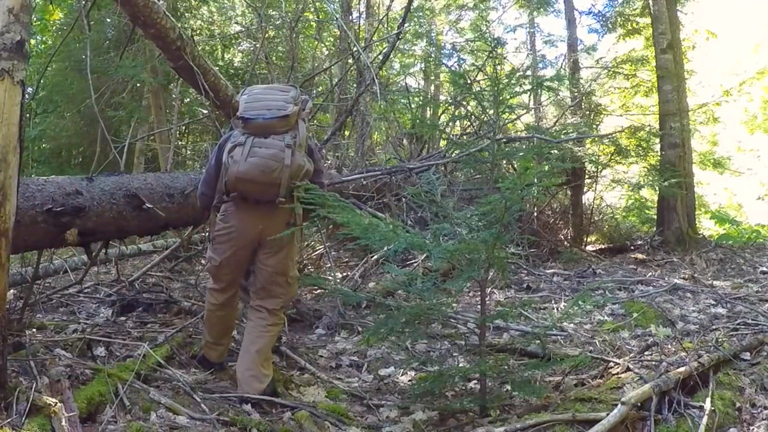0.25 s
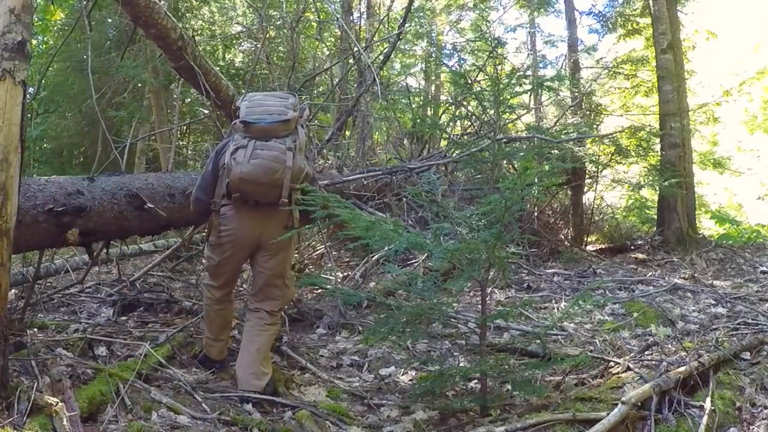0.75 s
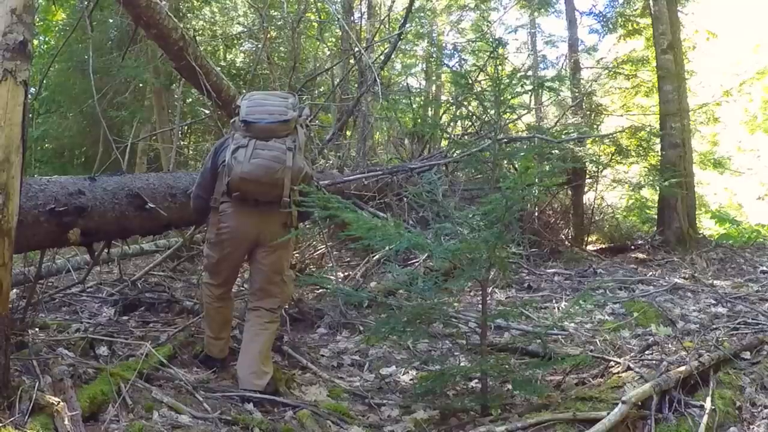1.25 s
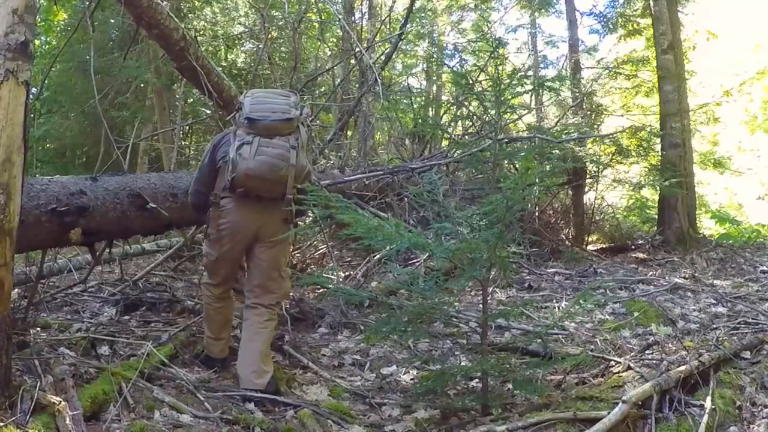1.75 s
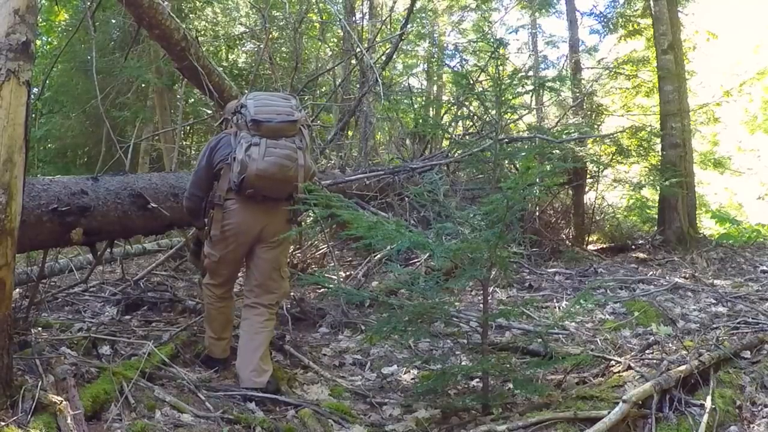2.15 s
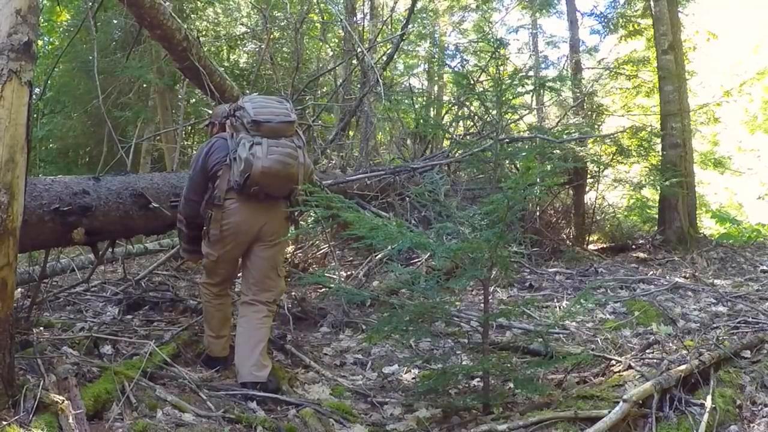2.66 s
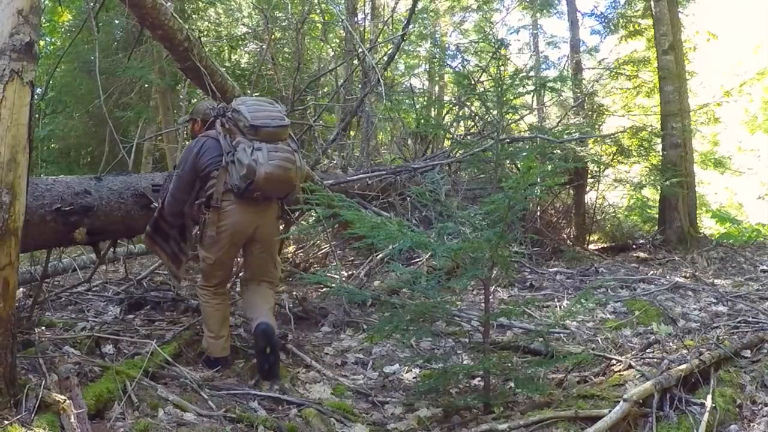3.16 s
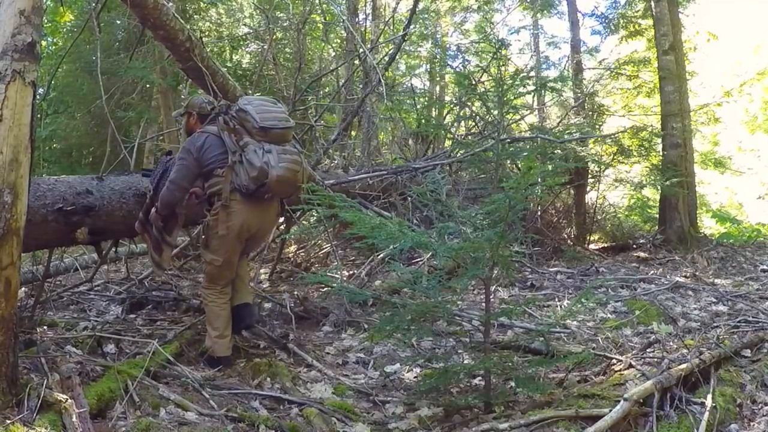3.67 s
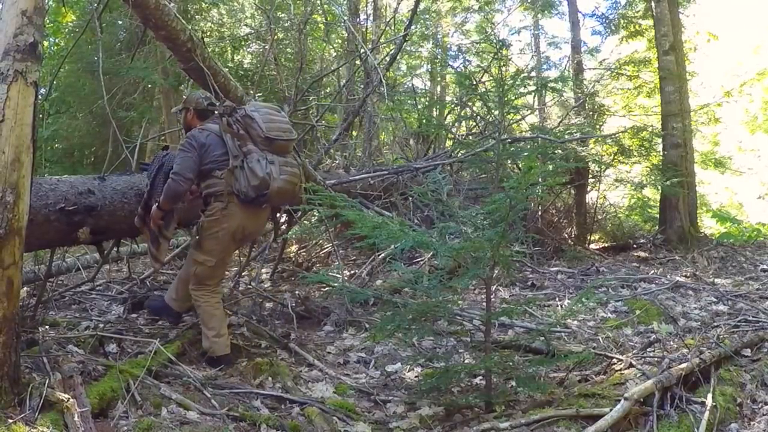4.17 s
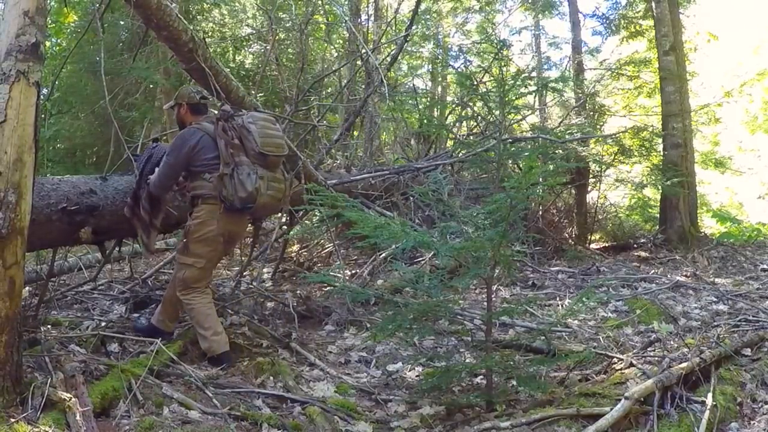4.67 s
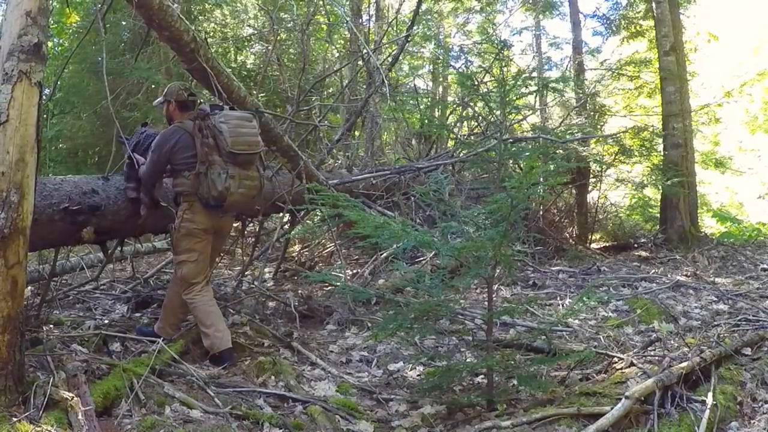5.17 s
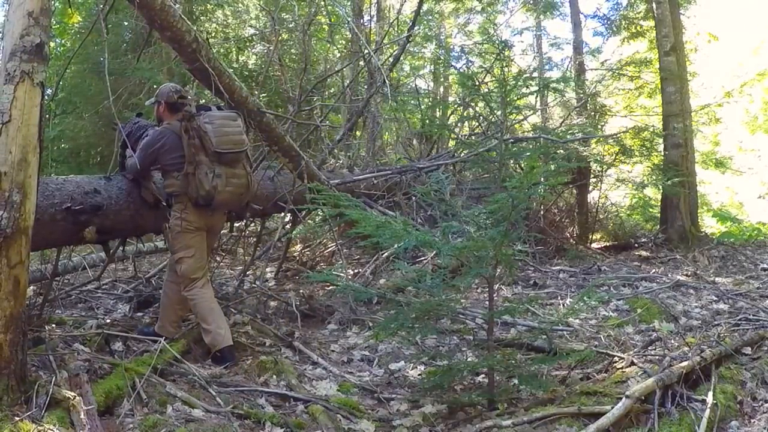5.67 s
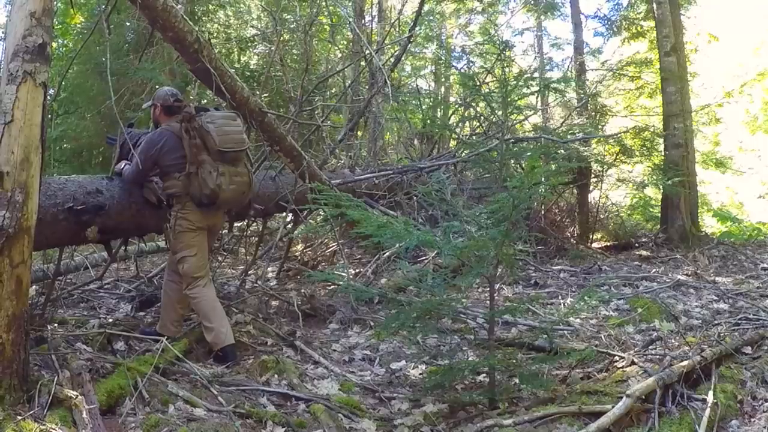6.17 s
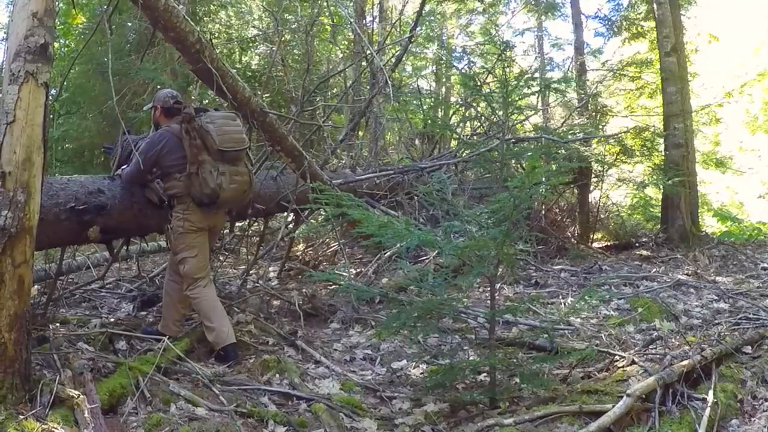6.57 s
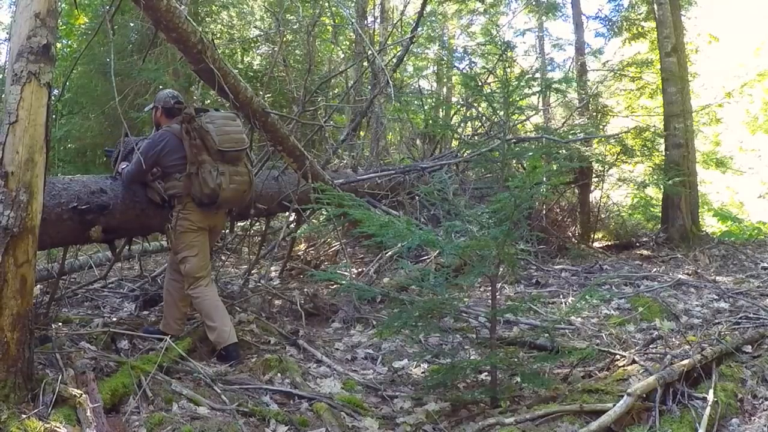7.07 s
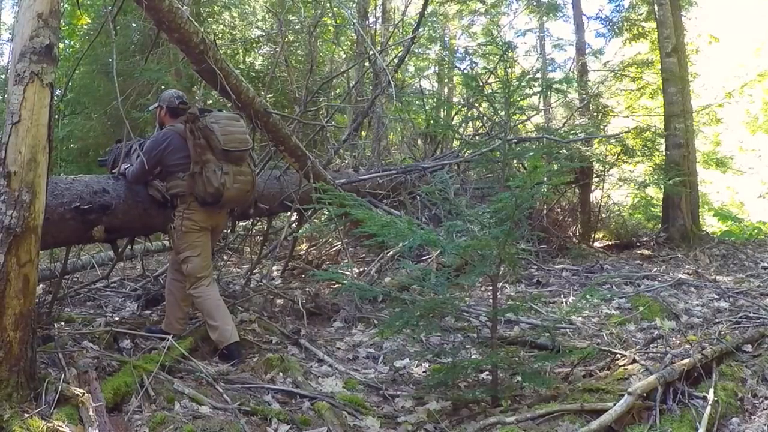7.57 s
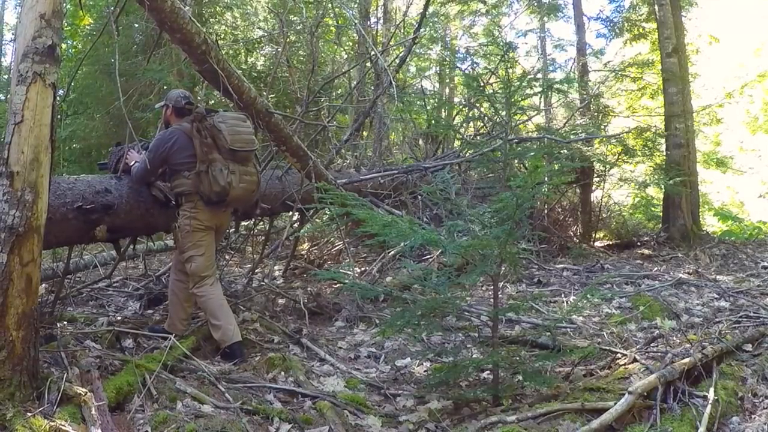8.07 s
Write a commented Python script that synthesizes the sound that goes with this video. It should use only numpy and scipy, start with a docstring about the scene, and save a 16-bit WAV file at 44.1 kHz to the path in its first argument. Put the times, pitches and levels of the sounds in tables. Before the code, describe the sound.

Quiet woodland air lies behind slow, uneven steps on dry litter, heard through a mono microphone. Sticks clatter lightly underfoot and a rotten one pops. Clothes rub softly and leaves crunch as the boots move on, snapping twigs, until a dead branch gives way with one loud, bright crack and a short echo from the trees. A few lighter snaps and rustles trail off.

```python
"""Twigs snap and loose sticks knock as a hiker shifts about on dry needles and leaves in a quiet forest.
Boots thud on soft ground, clothes rub and swish, and a hollow stick caves in with a pop. Then a dead
branch breaks with a loud crack that echoes among the trees, and smaller snaps follow. Each break is a
quick run of tearing fibres that makes the wood ring. Behind it all, air hushes faintly in the treetops."""
import sys
import numpy as np
from scipy import signal
from scipy.fft import rfft, irfft, next_fast_len
from scipy.io import wavfile

SR = 44100
rng = np.random.default_rng(int(sys.argv[2]) if len(sys.argv) > 2 else 0)


def wrap_up_sound(samples):
    """Save the sound to the file named by the first command line argument, as 16-bit audio."""
    columns = np.atleast_2d(samples).T
    # keep every value between -1 and 1, then stretch to whole-number steps
    tamed = np.clip(columns, -1, 1)
    steps = np.round(tamed * 32767).astype(np.int16)
    wavfile.write(sys.argv[1], SR, steps)


N = 366912

# Twig snaps: t/s, wood level/dB, wood f/Hz, crack level/dB, top level/dB, splintering time/s
# (the bright crack and the even brighter top are set against the wood level)
TWIG_SNAPS = [(0.0252, -46.5, 1010, -18, -21, 0.0036), (0.3082, -54.5, 3270, 3, -5, 0.00052),
              (0.3618, -62, 2970, 5, -4, 0.0006), (0.467, -54.5, 2400, 0, -10, 0.0006),
              (2.0483, -58.5, 2800, -4, -19, 0.0008), (2.1503, -57.5, 950, -7, -18, 0.006),
              (2.31, -65, 2800, -2, -4, 0.001), (2.705, -59, 1300, -11, -14, 0.002),
              (3.033, -40.5, 1700, -6.5, -10, 0.004), (3.296, -57.5, 3140, -3, -9, 0.0055),
              (4.1182, -59, 2970, -3, -7, 0.00081), (4.2181, -44.3, 1110, -14, -8.5, 0.0028),
              (4.3175, -51.5, 1550, -4, -15, 0.0036), (4.389, -61.5, 3230, -1, 11.5, 0.0025),
              (4.4117, -52.5, 1510, -15, -22, 0.0043), (4.442, -52.3, 1590, -8, -10, 0.0022),
              (4.4786, -47.3, 1770, -7, -14, 0.0007), (4.5782, -55, 2500, -1, 1, 0.0033),
              (4.6255, -51, 2970, -3, -1.5, 0.005), (4.811, -47, 3140, -10, -6, 0.001),
              (5.1112, -64.5, 3100, 8, 6.5, 0.0022), (5.2732, -51.5, 950, -7.5, -10, 0.0014),
              (5.3173, -58, 3230, -4, -23, 0.0007), (5.3666, -43, 1200, -6.5, -7.5, 0.003),
              (5.522, -52, 1100, -4, -15, 0.001), (5.5719, -50, 2300, -0.5, -16, 0.0025),
              (5.694, -47, 1060, -4.5, -13, 0.0018), (5.892, -40.5, 2900, -4, 1.5, 0.0025),
              (5.957, -46.5, 3120, -11, -13, 0.0005), (6.3366, -50, 2400, -5, -15, 0.0039),
              (7.454, -59, 2020, -11, -12.5, 0.0006), (7.8736, -55.5, 1610, -6, -18, 0.0037),
              (8.1982, -50.5, 1640, -14, -25, 0.0044), (8.262, -54.5, 1030, -7.5, -13, 0.0026)]
HOLLOW_S, HOLLOW_DB = 1.6004, -30   # the hollow stick caves in
BREAK_S, BREAK_DB = 4.8263, -16   # the dead branch breaks


def from_db(db):
    """Turn decibels into a factor to multiply by."""
    return 10 ** (np.asarray(db) / 20)


def rms_one(x):
    """Scale a sound so that its average strength (rms) is 1."""
    return x / np.sqrt(np.mean(x ** 2) + 1e-20)


def burst_one(x):
    """Scale a short sound to the energy of 10 ms at rms 1."""
    return x * np.sqrt(.01 * SR / (np.sum(x ** 2) + 1e-20))


def add(track, s, sound):
    """Mix a sound into the track, starting at s seconds."""
    start = max(0, round(s * SR))
    part = sound[:max(0, N - start)]
    track[start:start + len(part)] += part


def band(x, low_hz, high_hz):
    """Keep the part of a sound that lies between two frequencies."""
    edges_hz = [low_hz, min(high_hz, .45 * SR)]
    return signal.sosfilt(signal.butter(2, edges_hz, "band", fs=SR, output="sos"), x)


def resonate(x, hz, width_hz):
    """Make a sound ring at one pitch; a smaller width rings longer."""
    r = np.exp(-np.pi * width_hz / SR)
    feedback = [1, -2 * r * np.cos(2 * np.pi * hz / SR), r * r]
    return signal.lfilter(np.array([1, 0, -1]) * (1 - r * r) / 2, feedback, x)


def colour(x, spectrum):
    """Shape the lows and highs of a noise along a curve of (f/Hz, level/dB) points, at rms 1."""
    hz, db = np.transpose(spectrum)
    size = next_fast_len(len(x))
    bins_hz = np.maximum(np.arange(size // 2 + 1) * SR / size, 1)
    gain = from_db(np.interp(np.log(bins_hz), np.log(hz), db))
    return rms_one(irfft(rfft(x, size) * gain, size)[:len(x)])


def drift(per_s):
    """A curve that wanders to a new random value per_s times a second, at rms 1."""
    points = rng.standard_normal(4000)
    return rms_one(np.interp(np.arange(N) / SR * per_s, np.arange(len(points)), points))


def fracture(splinter_s, splinters, litter, litter_s, size=3000):
    """One fibre gives way, the rest tear in a fading run, and the litter on the ground scatters it."""
    t = np.arange(size) / SR
    first_click = burst_one(1. * (t == 0))
    fibres = rng.standard_normal(size) * rng.exponential(1, size) * np.exp(-t / splinter_s)
    scatter = rng.standard_normal(size) * np.exp(-t / litter_s)
    return first_click + splinters * burst_one(fibres) + litter * burst_one(scatter)


def wood_ring(tones, force):
    """Breaking wood rings at all of its own pitches at once."""
    rings = ((-1) ** k * from_db(db) * np.sqrt(width) * burst_one(resonate(force, hz, width))
             for k, (hz, width, db) in enumerate(tones))
    return burst_one(sum(rings))


def forest_hush(air_db=-60.5, sway_db=1.15, rumble_hz=40.6, rumble_width_hz=17):
    """Air in the treetops swells gently, with a faint hiss and a far, low rumble."""
    # Tone of the moving air: f/Hz, relative level/dB
    air_spectrum = [(35, -21), (65, -5), (100, -6.5), (150, -12), (220, -11.5), (350, -10), (520, -9),
                    (800, -10.5), (1200, -12.5), (1900, -15.5), (2750, -14.5), (3300, -18.5), (8000, -28.5),
                    (15500, -36)]
    air = from_db(air_db + sway_db * drift(1.914)) * colour(rng.standard_normal(N), air_spectrum)
    rumble = resonate(rng.standard_normal(N), rumble_hz, rumble_width_hz)
    rumble = from_db(-62) * rms_one(resonate(rumble, rumble_hz, rumble_width_hz))
    hiss = from_db(-77.5) * rms_one(band(rng.standard_normal(N), 2450, 2950))
    deep_rumble = from_db(-68) * rms_one(band(rng.standard_normal(N), 7.8, 48))
    return air + hiss + rumble + deep_rumble


def sound_to_trees():
    """Taken over all directions, each break heads for the trees as one plain pulse, dull or bright."""
    out, pulse = np.zeros(N), burst_one(signal.unit_impulse(256))
    bands_hz = (800, 1900), (3200, 16000), (7500, 17000)
    dull, mid, bright = (burst_one(band(pulse, *edges)) for edges in bands_hz)
    for s, wood_db, _, crack_db, top_db, _ in TWIG_SNAPS:
        shape = from_db(-18) * dull - from_db(crack_db - 9) * mid + from_db(top_db - 8) * bright
        add(out, s, from_db(wood_db) * shape)
    add(out, HOLLOW_S, from_db(HOLLOW_DB - 18) * (dull + bright))
    add(out, BREAK_S, from_db(BREAK_DB - 10) * pulse)
    return out


def forest_echo(x, near_fade_s=0.34, far_fade_s=.75, far_db=-19, build_s=0.015, size=40000):
    """Countless trunks and boughs throw back a bright, smooth echo; far trees answer longer and duller."""
    # Tone of the echo from the trees: f/Hz, relative level/dB
    echo_spectrum = [(150, -20), (600, -8.5), (1100, -11), (1700, -1.5), (2400, -1.5), (3300, 4),
                     (4500, 1.5), (5500, 1), (7000, -4.5), (10000, -8.5), (13000, -15.5), (15000, -14)]
    t = np.arange(size) / SR
    near = colour(rng.standard_normal(size), echo_spectrum) * from_db(-60 * t / near_fade_s)
    far = band(colour(rng.standard_normal(size), echo_spectrum), 297.3, 5000)
    far *= from_db(far_db - 60 * t / far_fade_s)
    echo = (1 - np.exp(-t / build_s)) * (near + far)
    return signal.fftconvolve(x, echo / np.sqrt(np.sum(echo ** 2)))[:N]


def cloth_swishes(width_share=0.15):
    """Cloth sliding over cloth gives a band of noise whose pitch follows the speed of the rub."""
    # Rubs of cloth: middle t/s, half length/s, level/dB, f/Hz, glide/(octaves per s)
    rubs = [(3.135, 0.034, -57, 790, 6.5), (2.4, .025, -65, 990, 4.5), (3.2, 0.021, -66, 1600, -8),
            (3.71, 0.024, -62.5, 3250, 3.5)]
    out, t = np.zeros(N), np.arange(-SR // 8, SR // 8) / SR
    for s, half_s, db, hz, glide in rubs:
        low_pass = signal.butter(2, width_share * hz, fs=SR, output="sos")
        slow_noise = signal.sosfilt(low_pass, rng.standard_normal((2, len(t))))
        phase = 2 * np.pi * np.cumsum(hz * 2 ** (glide * t)) / SR
        rub = rms_one(slow_noise[0] * np.cos(phase) + slow_noise[1] * np.sin(phase))
        add(out, s + t[0], from_db(db) * np.exp(-.5 * (t / half_s) ** 2) * rub)
    return out


def effort(stir_db=-74.3):
    """Each move builds up and lets go; gives the base levels of scuffing and leaves over time, in dB."""
    # Steps and shifts of weight: strongest t/s, build/s, release/s, base scuff level/dB,
    # leaf level against the scuff/dB
    moves = [(0.02, 0.07, 0.2, -58, -2), (0.48, .08, .2, -66, -4), (2.03, 0.056, 0.04, -63, 5.5),
             (2.18, .03, 0.16, -68.5, 3.5), (2.8, .13, .12, -63, -10), (3.08, 0.22, 0.079, -56.5, -0.5),
             (3.17, 0.055, 0.081, -61, 8), (3.64, 0.045, .05, -60.5, -12), (3.73, .03, 0.17, -68.5, -0.5),
             (4.17, .08, 0.22, -62.5, -0.5), (4.44, 0.14, 0.16, -62, 1.5), (4.77, 0.39, 0.31, -59, 4.5),
             (5.55, 0.16, .14, -65, 0), (6.02, 0.15, .12, -68, 1), (7.28, .25, .2, -68, -4),
             (8.05, .09, 0.12, -66.5, -2), (8.3, .09, .1, -68, 1)]
    t = np.arange(N) / SR
    scuff = leaves = from_db(stir_db) ** 2   # even standing still stirs the ground a little
    for s, build_s, release_s, db, leaf_db in moves:
        power = (from_db(db) * np.exp(-np.maximum((s - t) / build_s, (t - s) / release_s))) ** 2
        scuff = scuff + power
        leaves = leaves + power * from_db(leaf_db) ** 2
    return 10 * np.log10(scuff), 10 * np.log10(leaves)


def grains(per_s, spread_db, smooth):
    """Tiny random breaks of uneven size, on a smooth bed of ones too small to tell apart."""
    sizes = from_db(np.minimum(spread_db * rng.exponential(1, N), 17)) * rng.choice([-1, 1], N)
    return rms_one(sizes * (rng.random(N) < per_s / SR)) + smooth * rng.standard_normal(N)


def stalk_ticks(per_s=55, tick_db=-7.5, spread_db=2.0, pitches=8):
    """Single stalks give way and stand out of the crunch, each ringing at one of a few pitches."""
    rings = np.zeros(N)
    for hz in np.geomspace(1500, 11000, pitches):
        sizes = from_db(spread_db * np.minimum(rng.exponential(1, N), 3))
        breaks = rng.random(N) < per_s / pitches / SR
        rings += resonate(sizes * breaks, hz, hz * .6) / np.sqrt(hz)
    force = fracture(.001, splinters=0.91, litter=.4, litter_s=.004)
    return from_db(tick_db) * rms_one(signal.fftconvolve(rings, force)[:N])


def rustle(scuff_boost_db=1.4, leaf_boost_db=1.33, firm_step_db=-61.5):
    """Cloth and soles rub dully while leaves and needles break in countless tiny grains."""
    # Dull tone of rubbing cloth and soles: f/Hz, relative level/dB
    scuff_spectrum = [(60, 2), (200, -4.5), (400, 1), (700, 5), (1200, 1), (2200, -12), (5000, -31.5),
                      (15000, -52.5)]
    # Crisp tone of dry leaves: f/Hz, relative level/dB
    leaf_spectrum = [(400, -9.5), (1200, 0), (3000, 1), (5000, -3.5), (7500, -14.5), (10500, -24),
                     (15000, -31)]
    # Thin, high tone of dry needles: f/Hz, relative level/dB
    needle_spectrum = [(3000, -24), (6000, -3), (8000, -7.5), (10500, 1.5), (12500, -1.5), (15000, -11)]
    scuff_db, leaf_db = effort()
    needle_db = -71.5 + 1.1 * (leaf_db - firm_step_db)   # needles swell a bit more than leaves
    flicker = from_db(1.2 * drift(110))
    scuff = colour(grains(per_s=1100, spread_db=3.5, smooth=1.05), scuff_spectrum)
    leaves = colour(grains(per_s=2000, spread_db=4.0, smooth=0.76), leaf_spectrum) + stalk_ticks()
    needles = colour(grains(per_s=2000, spread_db=0.5, smooth=.6), needle_spectrum)
    return flicker * (from_db(scuff_db + scuff_boost_db) * scuff
                      + from_db(leaf_db + leaf_boost_db) * leaves
                      + from_db(needle_db) * needles)


def boot_thuds(decay_s=0.007, crumble_share=0.52, crumble_s=.022, size=5000):
    """The springy ground answers a boot with a short, low thud, then the soil crumbles and settles."""
    # Boots pressing on soft ground: t/s, level/dB, f/Hz
    thuds = [(0.026, -45.5, 190), (1.6024, -38, 86), (3.319, -45, 104), (4.382, -47, 130),
             (4.623, -44.5, 110), (4.829, -36.5, 80), (4.862, -42.5, 104.3), (5.366, -48, 171)]
    out, t = np.zeros(N), np.arange(size) / SR
    for s, db, hz in thuds:
        push = np.sin(2 * np.pi * hz * t) * np.exp(-t / decay_s)
        settle = band(rng.standard_normal(size) * np.exp(-t / crumble_s), hz / 2, hz * 2)
        add(out, s, from_db(db) * (push + crumble_share * settle / np.max(np.abs(settle))))
    return out


def stick_knocks(overtone_ratio=2.3, overtone_db=-13, tap_db=-10, touch_loss_db=4, ring_q=5.5):
    """Sticks bump together: a dry tap, a short note as they bend, and a weaker, higher note."""
    # Sticks rocking under a boot: t/s, level/dB, f/Hz, time between touches/s, number of touches
    knocks = [(0.0354, -46.5, 940, 0.032, 2), (0.1172, -52.5, 1170, .03, 1),
              (0.1652, -50.5, 1060, 0.031, 3), (0.2846, -49.5, 880, 0.037, 3), (0.3881, -47, 840, 0.045, 3),
              (0.576, -53.5, 955, .03, 1), (4.788, -51, 1230, .03, 1), (4.926, -52, 1280, .03, 1),
              (5.041, -51.5, 1400, .0212, 3), (5.1555, -52.5, 850, 0.026, 2), (5.2077, -45, 786, .011, 2),
              (8.167, -56, 1380, .03, 1)]
    out = np.zeros(N)
    for s, db, hz, gap_s, touches in knocks:
        for k in range(round(touches)):
            push = band(fracture(.0014, splinters=.7, litter=.3, litter_s=.007), 350, 2200)
            low, high = (burst_one(resonate(push, f, f / ring_q)) for f in (hz, hz * overtone_ratio))
            knock = burst_one(low + from_db(overtone_db) * high + from_db(tap_db) * burst_one(push))
            add(out, s + k * gap_s, from_db(db - k * touch_loss_db) * knock)
    return out


def trunk_bounce(x, delay_s=.0056, bounce_db=-15):
    """A fallen trunk a metre behind the boots throws each small snap back once."""
    out = x.copy()
    add(out, delay_s, from_db(bounce_db) * x)
    return out


def twig_snaps(ring_q=1.9, ring_share=0.4, usual_splinter_s=0.0026):
    """Each snap rings briefly in its twig, with a low push below it and a bright crack above."""
    out = np.zeros(N)
    for s, wood_db, hz, crack_db, top_db, splinter_s in TWIG_SNAPS:
        # a tougher twig breaks more slowly, splinters more and pushes harder
        toughness = splinter_s / usual_splinter_s
        push_db = -10.5 + 7.5 * np.log2(toughness)
        force = fracture(splinter_s, splinters=toughness, litter=0.375, litter_s=0.007)
        twig = burst_one(force) + ring_share * burst_one(resonate(force, hz, hz / ring_q))
        wood = burst_one(band(twig, min(1150, 0.72 * hz), 3100))
        push = from_db(push_db) * burst_one(band(force, 210, 680))
        crack = from_db(crack_db) * burst_one(band(force, 3700, 6460))
        top = from_db(top_db) * burst_one(band(force, 9500, 13300))
        add(out, s, from_db(wood_db) * (wood - push - crack + top))
    return out


def hollow_stick(bounce_delay_s=0.0048, bounce_db=-13):
    """A hollow, half-rotten stick caves in: one clean pop, and a faint bounce off the ground follows."""
    # Pitches at which the hollow stick rings: f/Hz, width/Hz, relative level/dB
    stick_tones = [(262, 160, -8.5), (553, 170, 0), (1400, 470, -1), (2290, 770, 0), (2880, 420, 1.5),
                   (4570, 1400, -13), (6440, 1700, -15.5), (11300, 3100, -17)]
    out = np.zeros(N)
    pop = wood_ring(stick_tones, fracture(0.00068, splinters=0.59, litter=0.3, litter_s=0.0078))
    ground_bounce = wood_ring(stick_tones, fracture(.0015, splinters=0.98, litter=0.3, litter_s=.007))
    add(out, HOLLOW_S, from_db(HOLLOW_DB) * pop)
    add(out, HOLLOW_S + bounce_delay_s, from_db(HOLLOW_DB + bounce_db) * ground_bounce)
    return out


def branch_break(thump_db=-22, strands_s=4.8391, strands_db=-17):
    """A thick dead branch breaks in a dense run of tearing fibres, and the last strands follow."""
    # Pitches at which the dead branch rings: f/Hz, width/Hz, relative level/dB
    branch_tones = [(650, 140, -9), (1760, 190, 3.5), (2450, 400, -3.5), (3000, 300, 0), (3950, 450, -6),
                    (4700, 230, -2), (6170, 270, -4), (7540, 350, -8), (7900, 400, -12), (8400, 770, -13),
                    (9870, 790, -7.5), (11470, 1000, -10.5), (12730, 830, -14.5)]
    out = np.zeros(N)
    force = fracture(.002, splinters=.85, litter=.45, litter_s=.011)
    thump = from_db(thump_db) * burst_one(band(force, 160, 760))
    add(out, BREAK_S, from_db(BREAK_DB) * (wood_ring(branch_tones, force) + thump))
    strands = band(fracture(.001, splinters=.8, litter=.4, litter_s=.008), 2400, 5000)
    add(out, strands_s, from_db(BREAK_DB + strands_db) * burst_one(strands))
    return out


def scene():
    """Breaking wood and its echo, the hiker's movement, and the forest behind, in one channel."""
    wood = trunk_bounce(twig_snaps()) + stick_knocks() + hollow_stick() + branch_break()
    echo = forest_echo(sound_to_trees())
    hiker = boot_thuds() + rustle() + cloth_swishes()
    return (wood + echo + hiker + forest_hush())[None]


def record(dry, cutoff_hz=15600):
    """A mono microphone that steeply cuts off the highest treble."""
    return signal.sosfilt(signal.ellip(10, .1, 70, cutoff_hz, fs=SR, output="sos"), dry)


dry = scene()
out = record(dry)
wrap_up_sound(out)
```